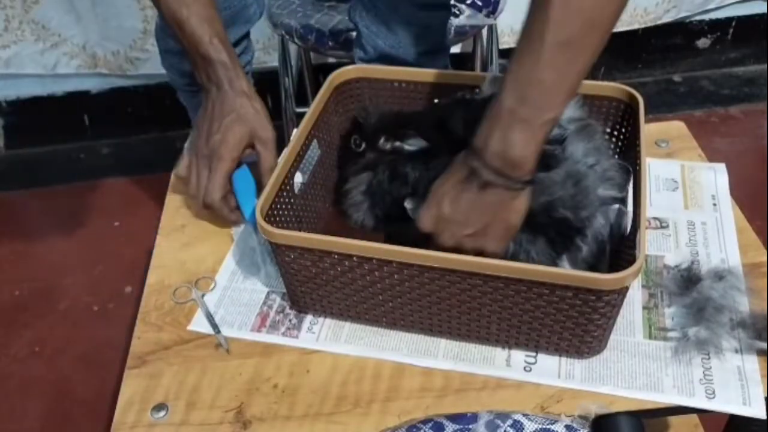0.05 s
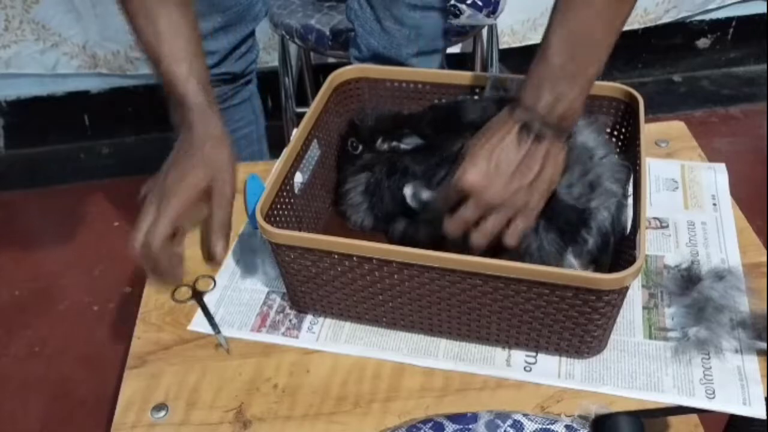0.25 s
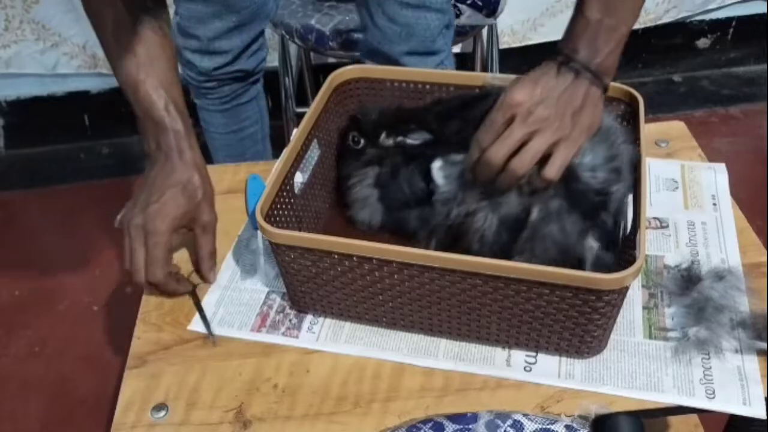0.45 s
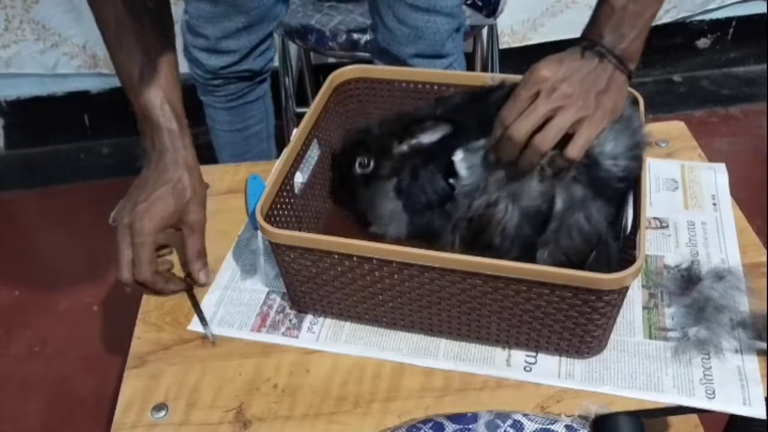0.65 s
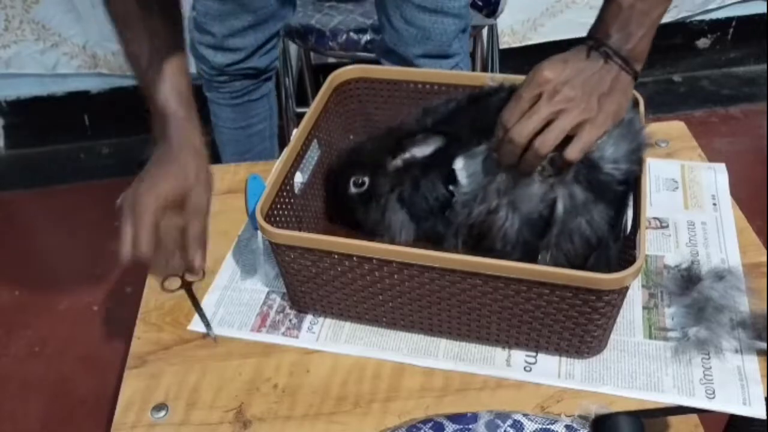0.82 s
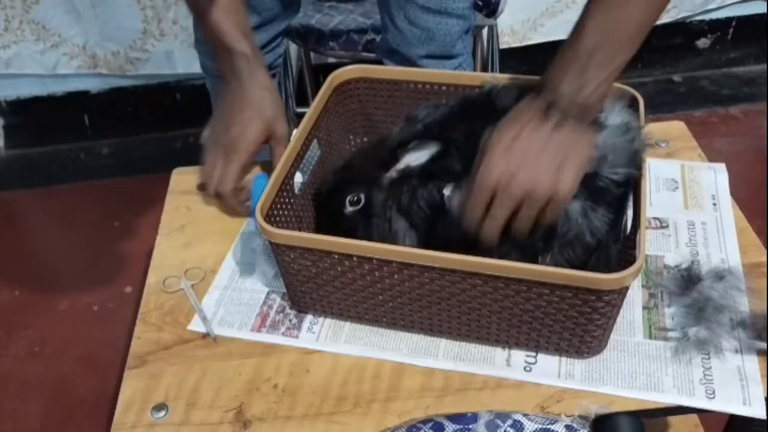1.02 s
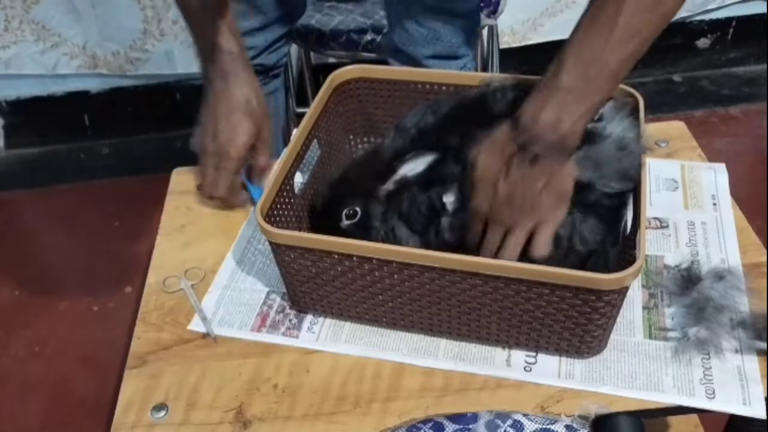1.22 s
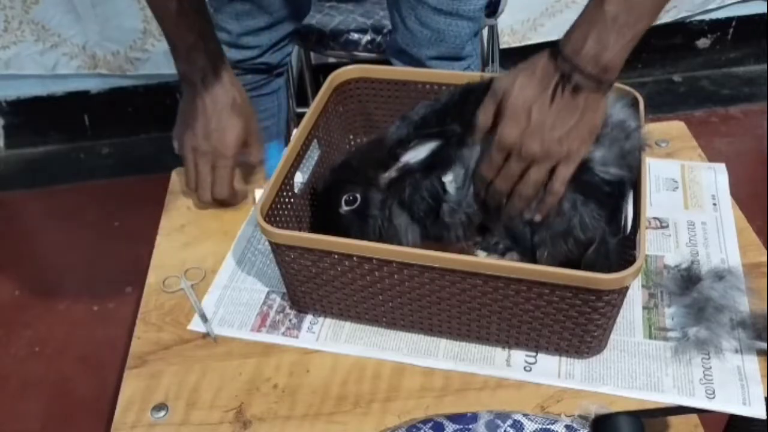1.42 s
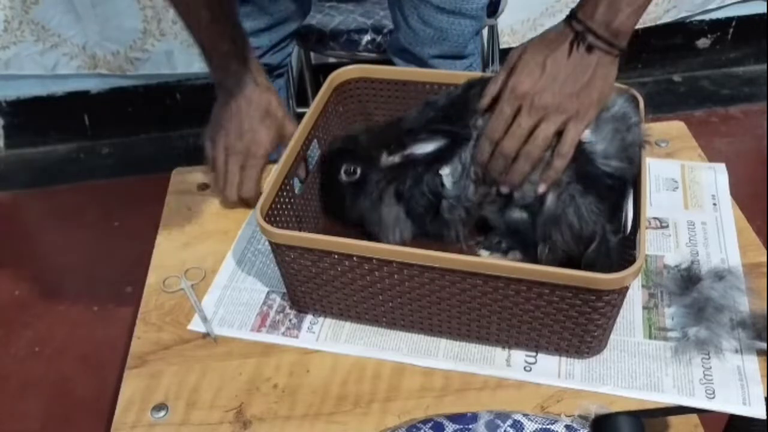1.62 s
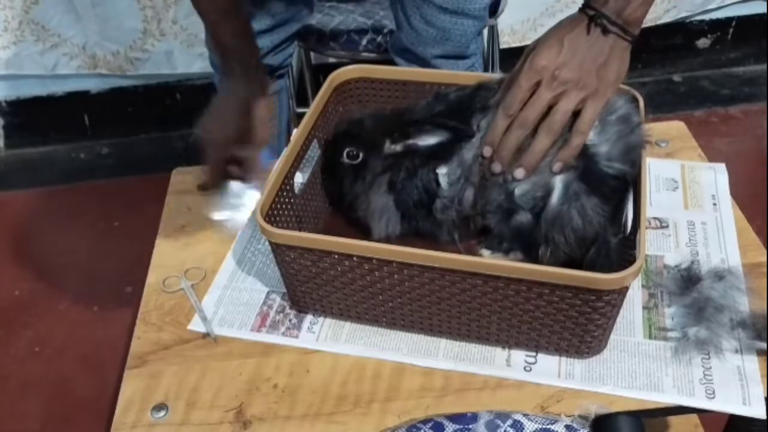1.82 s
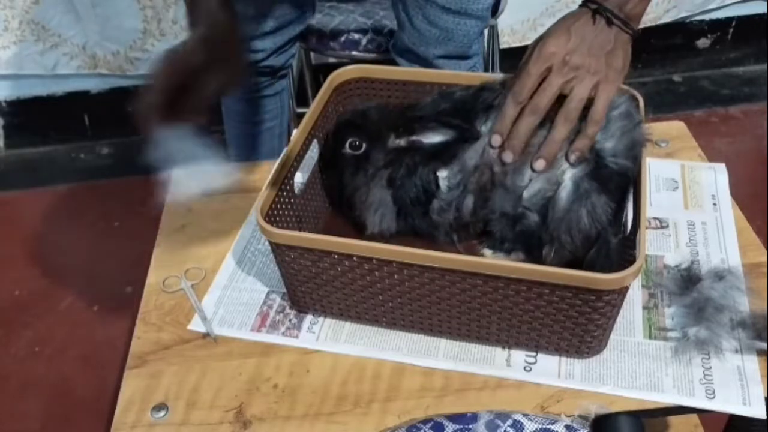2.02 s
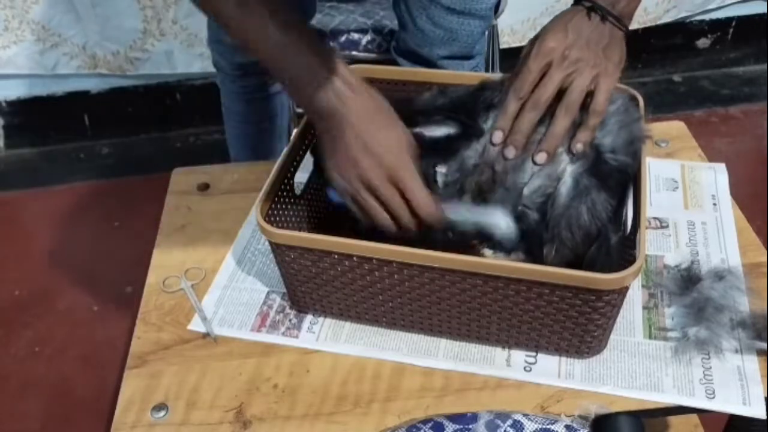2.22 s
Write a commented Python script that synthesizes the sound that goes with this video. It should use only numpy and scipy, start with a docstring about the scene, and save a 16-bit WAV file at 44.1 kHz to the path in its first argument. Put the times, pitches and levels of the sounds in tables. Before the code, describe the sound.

Grooming tools knock and rattle on a wooden tabletop, with soft rustles of fur.

```python
"""Scissors, fur and a brush

Steel scissors rattle down on a wooden table in a bare, echoing room and chink as the fingers leave.
A hand strokes an animal's fur, then a hollow plastic brush slides and clatters as it is picked up.
Knocks are pulses with a short crack; rustles and drags are dense tiny slips.
The table top hums under every knock and drag; a thin hiss lies behind."""
import sys
import numpy as np
from scipy import signal
from scipy.fft import rfft, irfft
from scipy.io import wavfile
from scipy.ndimage import uniform_filter1d

SR = 44100
rng = np.random.default_rng(int(sys.argv[2]) if len(sys.argv) > 2 else 0)


def pcm_store(signal):
    """Save signal as 16-bit PCM."""
    levels = np.round(np.clip(np.atleast_2d(signal), -1, 1) * 32767)
    wavfile.write(sys.argv[1], SR, levels.astype(np.int16).T)


N = 103635

# blows: t/s, level/dB at 250, 1000, 3000 Hz
SCISSOR_KNOCKS = [(.2487, 21, 18, 6.5), (.264, -5, 12.5, -8.5), (.2718, 10.5, -7, 7.5),
                  (.287, 15.5, 5.5, -6), (.3178, 9.5, 6, 10.5), (.338, -16, 14.5, -15.5),
                  (.354, -1.5, 9.5, -25.5), (.3798, 21, 15, 4), (.407, 17, 9.5, -12.5)]
# knock spectrum: f/Hz, level/dB
SCISSOR_TONE = [(40, -38.5), (120, -18.5), (180, 0.5), (400, -0.5), (700, -5.5), (1050, 0), (1450, -3.5),
                (2700, -1.5), (3100, -7), (3700, 0.5), (4600, -16.5), (8700, -34), (12000, -66)]
def scissor_knocks():
    """The scissors land and rattle on the wood."""
    return knocks(SCISSOR_KNOCKS, SCISSOR_TONE)


# steel modes: f/Hz, level/dB, T60/s
BLADE_MODES = [(1060, -43.5, 0.15), (2230, -29.5, 0.015), (2460, -41.5, 0.14), (2630, -14, 0.01),
               (3750, -22.5, 0.016), (5110, -25.5, 0.014), (7420, -32, 0.011)]
# touches: t/s, level/dB, treble shelf/dB
CHINKS = [(.790, -7.5, -10), (0.861, -13, -5.5), (.893, -6.5, -1)]
def blade_chinks(shelf_hz=(2200, 2500), top_hz=8300):
    """The blades touch and ring, each time with its own brightness."""
    out = np.zeros(N)
    for s, db, treble_db in CHINKS:
        touch = click(np.c_[shelf_hz, [db, db + treble_db]])
        add(out, s, convolve(ringing(BLADE_MODES), touch))
    return signal.sosfilt(signal.butter(4, top_hz, fs=SR, output="sos"), out + 1e-18)


# blows: t/s, level/dB at 250, 1000, 3000 Hz
BRUSH_KNOCKS = [(1.187, -12, -13.5, -27), (1.2538, 6, 4, -4.5), (1.4515, -15.5, 8.5, 9.5),
                (1.5478, 21.5, 11.5, 0.5), (1.5518, 10.5, 4.5, -6), (1.5925, -7, 5.5, 6.5),
                (1.6205, 4, 16.5, -12.5), (1.6672, 9.5, 8, 7.5), (1.964, -5, -7.5, -12.5)]
# knock spectrum: f/Hz, level/dB
BRUSH_TONE = [(40, -33), (120, -20), (190, -3), (620, 3.5), (800, -6), (1100, 1.5), (2400, 3.5),
              (4100, -5.5), (5000, -16), (8700, -52), (12000, -49)]
def brush_knocks():
    """The brush is gripped and clatters against the wood."""
    return knocks(BRUSH_KNOCKS, BRUSH_TONE)


# plastic modes: f/Hz, level/dB, T60/s
BRUSH_MODES = [(421, -51.5, .55), (620, -55.5, 0.27), (715, -52, 0.91), (1084, -42, 0.03),
               (2340, -32, 0.014)]
def brush_ring(blows):
    """Blows set the hollow brush ringing."""
    return convolve(blows, ringing(BRUSH_MODES))


# edge contacts: t/s, level/dB
TICKS = [(0.2484, -24), (0.271, -8.5), (0.317, -11.5), (.3375, -13), (.354, -16), (1.393, -18),
         (1.4513, -9), (1.47, -24), (1.5508, -7), (1.5925, -14.5), (1.888, -22)]
# tick spectrum: f/Hz, level/dB
TICK_TONE = [(1000, -20), (6300, 2.5), (9500, -9), (14000, -29)]
def edge_ticks(t60_s=.005):
    """The tools' hard edges meet in very short, bright ticks."""
    out = np.zeros(N)
    for s, db in TICKS:
        add(out, s, from_db(db) * contact(t60_s, TICK_TONE))
    return out


# rustles: t/s, length/s, level/dB
RUSTLES = [(.555, 0.15, -44), (1.17, 0.32, -60), (1.74, 0.26, -58), (1.885, 0.046, -49), (2.22, 0.15, -67)]
# rustle spectrum: f/Hz, level/dB
RUSTLE_TONE = [(300, -16), (1000, 1), (2500, 2.5), (4500, 0.5), (8500, -7.5), (11500, -13.5), (15000, -21)]
def soft_rustles():
    """Soft rustles: a hand strokes fur, then the brush slides."""
    return envelope(RUSTLES, attack_s=.033, release_s=.068) * friction(RUSTLE_TONE, grain_db=2.5)


DRAG_ATTACK_S = .021
# slides: t/s, length/s, scrape level/dB, hum level/dB
DRAGS = [(0.012, 0.24, -60.5, -52), (0.258, 0.26, -42.5, -33.5), (0.652, .22, -57, -45.5),
         (1.158, 0.11, -50.5, -50.5), (1.264, 0.41, -48, -41.5), (1.548, 0.26, -42.5, -55.5),
         (1.897, 0.078, -45.5, -44.5), (2.247, 0.11, -74, -74)]
# scrape spectrum: f/Hz, level/dB
DRAG_TONE = [(40, -24.5), (120, -7), (200, 8), (550, 3.5), (900, -10.5), (2500, -10), (5000, -20),
             (15000, -102.5)]
def drag_scrapes():
    """Tools and fingers scrape over the wood."""
    slides = [(s, length, db) for s, length, db, _ in DRAGS]
    return envelope(slides, DRAG_ATTACK_S, release_s=.036) * friction(DRAG_TONE, grain_db=5.5)


# table top modes: f/Hz, level/dB, T60/s
TABLE_MODES = [(188.73, -45.5, 0.86), (298.7, -49, 0.48), (399.3, -50.5, 1), (247.8, -54, 1),
               (545, -77, 0.23), (844, -67.5, 0.14), (1066, -60.5, 1)]
def table_ring(blows):
    """Blows set the table top ringing."""
    return convolve(blows, ringing(TABLE_MODES))


def table_hum():
    """Dragging sustains the table's three strongest modes, even in level, wandering in phase."""
    hum = 0
    for hz, db, t60 in TABLE_MODES[:3]:
        driven = convolve(rng.standard_normal(N), ringing([(hz, db, t60)]))
        phase = np.angle(signal.hilbert(driven))
        band = signal.butter(2, [hz * .9, hz * 1.1], "band", fs=SR, output="sos")
        hum += from_db(db) * signal.sosfilt(band, np.cos(phase))
    slides = [(s, length, db) for s, length, _, db in DRAGS]
    return envelope(slides, DRAG_ATTACK_S, release_s=.12) * hum / hum.std()


# left minus right: f/Hz, level/dB
PAN = [(1200, -1), (4000, 8), (8500, -4), (13000, -9.5)]
def direct_path(x, right_lead_s=.00011):
    """Direct sound reaches the two sides with a small lag and unequal colour."""
    hz, spectrum = np.arange(N // 2 + 1) * SR / N, rfft(x)
    gain = from_db(at_hz(PAN, hz) / 2)
    delay = np.exp(-2j * np.pi * hz * right_lead_s)
    return irfft(np.array([spectrum * gain * delay, spectrum / gain]), N)


# echo decay: f/Hz, T60/s
ROOM_T60 = [(150, 1.25), (500, 0.55), (1500, 0.6), (4000, 0.46), (8000, .5), (14000, 0.23)]
# echo spectrum: f/Hz, level/dB
ROOM_TONE = [(170, -2), (500, 2), (1200, 4.5), (3000, 2.5), (7000, 2.5), (13000, 1)]
def room(x, bands=14, build_s=.0065):
    """Diffuse echoes build quickly and die band by band."""
    t, noise = np.arange(N) / SR, diffuse_spectra()
    hz, centres = np.arange(N // 2 + 1) * SR / N, np.geomspace(100, 16000, bands)
    response = 0
    for centre, share in zip(centres, np.eye(bands)):
        rate = np.log(1000) / at_hz(ROOM_T60, centre)
        tail = np.exp(-rate * t) * (1 - np.exp(-t / build_s))
        band = irfft(noise * at_hz(np.c_[centres, share], hz), N)
        response += band * tail / np.linalg.norm(tail) * from_db(at_hz(ROOM_TONE, centre))
    return np.array([convolve(x, side) for side in response])


# side relative to mid: f/Hz, level/dB
DIFFUSE_WIDTH = [(80, -1.5), (170, -9), (350, -8), (700, -2), (1500, 1.5), (8000, -1.5)]
def diffuse_spectra():
    """Left and right noise spectra: alike in the upper bass, nearly unrelated in the treble."""
    mid, side = rfft(rng.standard_normal((2, N)))
    width = from_db(at_hz(DIFFUSE_WIDTH, np.arange(len(mid)) * SR / N))
    return np.array([mid + width * side, mid - width * side]) / np.sqrt(1 + width ** 2)


# hiss spectrum: f/Hz, level/dB
HISS_TONE = [(35, -56), (120, -47.5), (1000, -55.5), (3800, -58), (5900, -63), (6800, -53.5), (7800, -67.5),
             (9300, -58.5), (11000, -79.5)]
# high tones: f/Hz, width/Hz, level/dB
WHINES = [(5480, 38, -74), (6340, 140, -69.5)]
def hiss():
    """Steady hiss with two thin wavering tones."""
    out = np.array([convolve(side, click(HISS_TONE)) for side in irfft(diffuse_spectra(), N)])
    for hz, width_hz, db in WHINES:
        b, a = signal.iirpeak(hz, hz / width_hz, fs=SR)
        whine = signal.lfilter(b, a, signal.lfilter(b, a, rng.standard_normal((2, N))))
        out += from_db(db) * whine / whine.std()
    return out


def knocks(rows, tone, bands_hz=(250, 1000, 3000), crack_t60_s=.023):
    """A tool strikes the wood, each blow with its own colour."""
    out = np.zeros(N)
    for s, *levels_db in rows:
        add(out, s, contact(crack_t60_s, tone, np.c_[bands_hz, levels_db]))
    return out


def contact(t60_s, *tones, crack_db=3, size=4096):
    """An impact: a pulse, then a short dense crack above the bass."""
    crack = rng.standard_normal(size) * np.exp(-np.log(1000) * np.arange(size) / SR / t60_s)
    crack = signal.sosfilt(signal.butter(2, 600, "high", fs=SR, output="sos"), crack)
    crack *= from_db(crack_db) / np.linalg.norm(crack)
    crack[0] += 1  # the pulse
    return -convolve(crack, click(*tones)) / np.linalg.norm(crack)


def friction(tone, grain_db, slips_per_s=2800):
    """Sliding: dense tiny slips of uneven size, at unit RMS."""
    slips = (rng.random(N) < slips_per_s / SR) * rng.standard_normal(N)
    slips *= from_db(grain_db * np.minimum(rng.exponential(1, N), 2))
    rub = convolve(slips, click(tone))
    return rub / rub.std()


def envelope(rows, attack_s, release_s):
    """Linear attack, hold and release per movement."""
    t, out = np.arange(N) / SR, 0
    for s, length, db in rows:
        rise = np.clip((t - s) / attack_s, 0, 1)
        fall = np.clip((s + length - t) / release_s + .5, 0, 1)
        out += from_db(db) * rise * fall
    return out


def ringing(modes):
    """Decaying sines of a struck body."""
    t = np.arange(N) / SR
    return sum(from_db(db - 60 * t / t60) * np.cos(2 * np.pi * hz * t) for hz, db, t60 in modes)


def click(*tones, size=2048):
    """Minimum-phase pulse with the given spectra in cascade."""
    hz = np.arange(size // 2 + 1) * SR / size
    cepstrum = irfft(np.log(from_db(sum(at_hz(tone, hz) for tone in tones))))
    cepstrum[1:size // 2] *= 2
    cepstrum[size // 2 + 1:] = 0
    return irfft(np.exp(rfft(cepstrum)))


def from_db(db):
    """Decibels to gain."""
    return 10 ** (np.asarray(db) / 20)


def at_hz(points, hz):
    """Interpolate over log frequency."""
    knots_hz, values = np.transpose(points)
    return np.interp(np.log(np.maximum(hz, 1)), np.log(knots_hz), values)


def convolve(x, response):
    """Convolution cut to N samples."""
    return signal.fftconvolve(x, response)[:N]


def add(out, s, sound):
    """Mix a sound in at s seconds."""
    start = max(int(s * SR), 0)
    out[start:start + len(sound)] += sound[:N - start]


def suppress_noise(x, threshold_db=-45, slope=.8, max_cut_db=8, smooth_s=.0033, size=1024):
    """Turn down quiet parts of the bass and middle, shortening tails."""
    hz, _, frames = signal.stft(x, SR, nperseg=size)
    power = uniform_filter1d(np.mean(abs(frames) ** 2, axis=0), size=9, axis=0) * size
    pole = np.exp(-size / 2 / SR / smooth_s)
    level_db = 10 * np.log10(abs(signal.lfilter([1 - pole], [1, -pole], power)) + 1e-14)
    cut_db = np.clip((threshold_db - level_db) * slope, 0, max_cut_db)
    cut_db *= np.interp(hz, (3500, 5500), (1, 0))[:, None]
    return signal.istft(frames * from_db(-cut_db), SR, nperseg=size)[1][:, :N]


def scene(tick_send_db=-1.5):
    """Contacts and rubs echo in the room; the table and brush resonances are heard direct."""
    brush = brush_knocks()
    blows = scissor_knocks() + brush
    handling = blows + drag_scrapes() + soft_rustles() + blade_chinks()
    bodies = table_ring(blows) + table_hum() + brush_ring(brush)
    ticks = edge_ticks()
    echoes = room(handling + from_db(tick_send_db) * ticks)
    return direct_path(handling + ticks + bodies) + echoes + hiss()


def record(dry, cutoff_hz=15300):
    """Noise suppression, then a steep low-pass."""
    lowpass = signal.ellip(10, .2, 80, cutoff_hz, fs=SR, output="sos")
    return signal.sosfilt(lowpass, suppress_noise(dry))


dry = scene()
out = record(dry)
pcm_store(out)
```